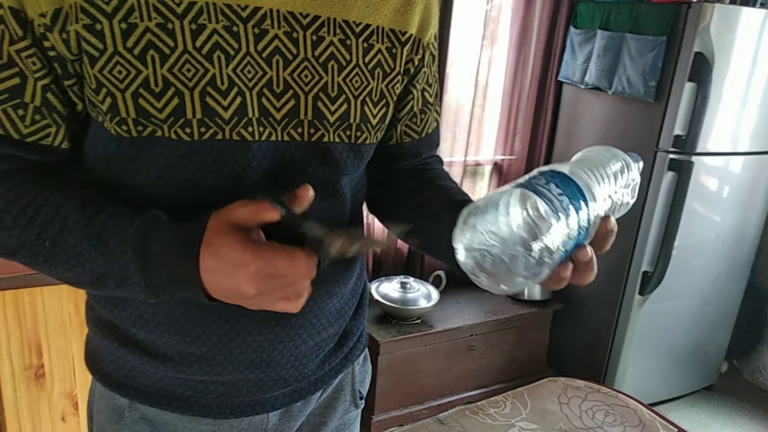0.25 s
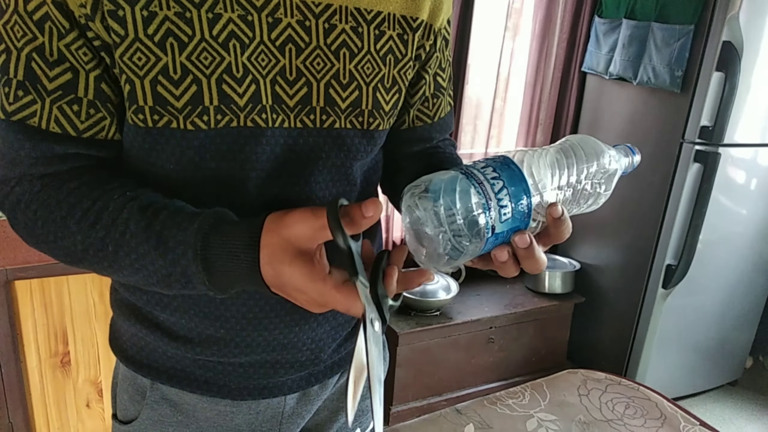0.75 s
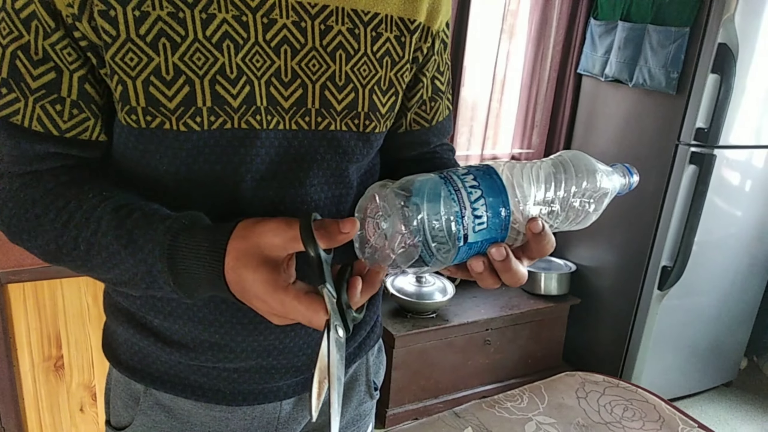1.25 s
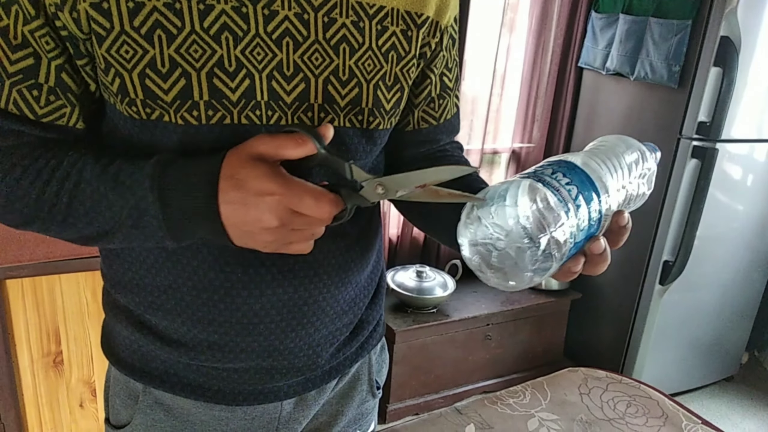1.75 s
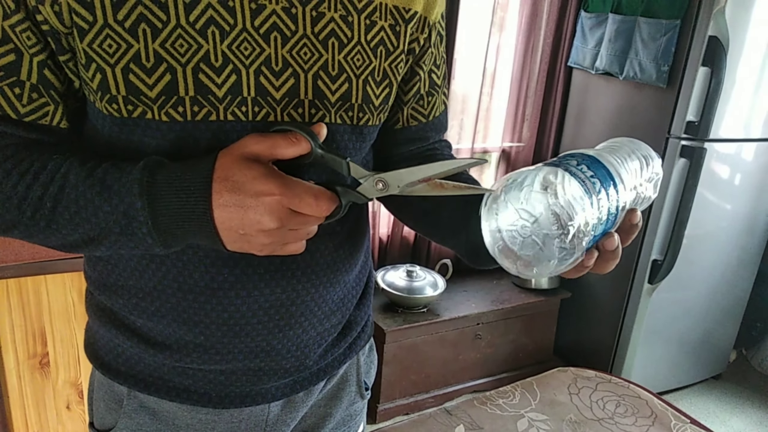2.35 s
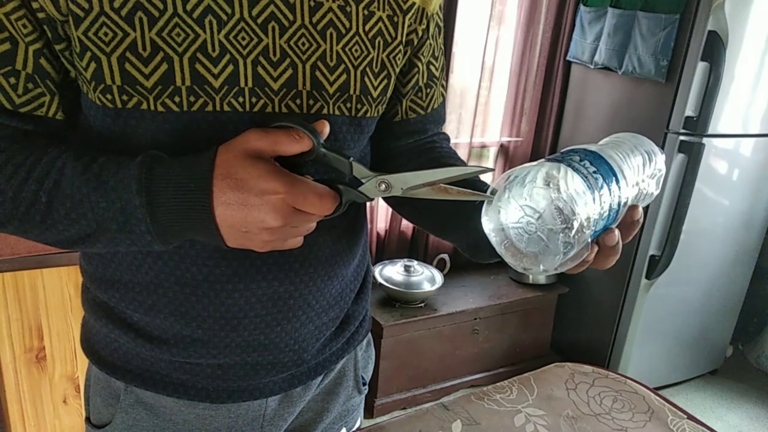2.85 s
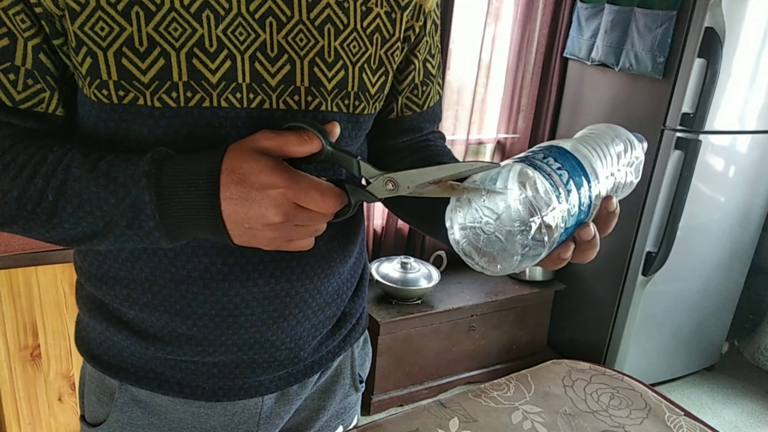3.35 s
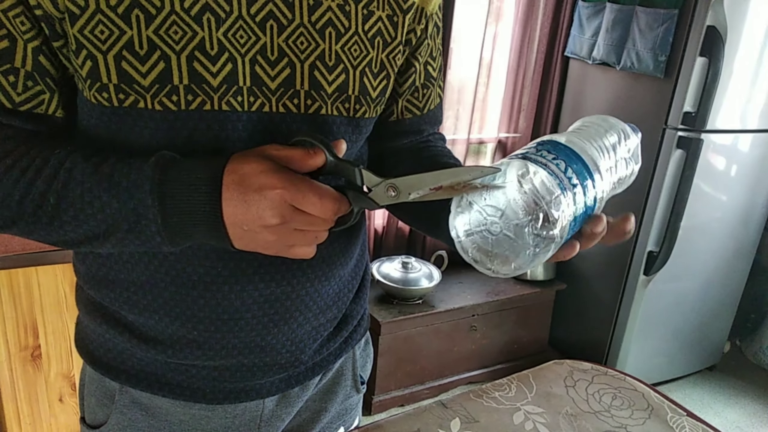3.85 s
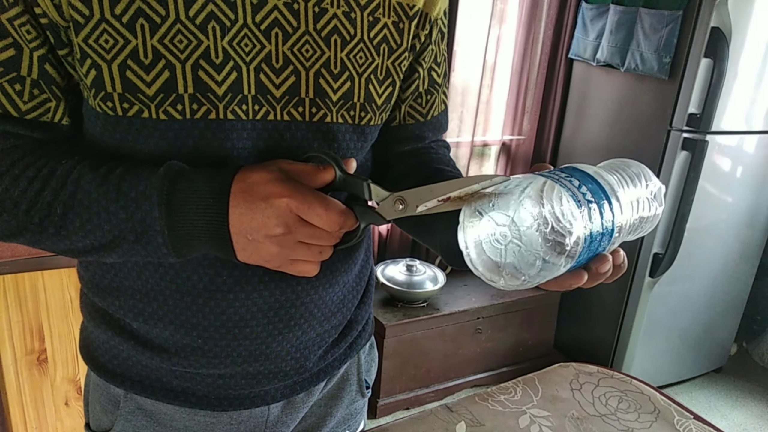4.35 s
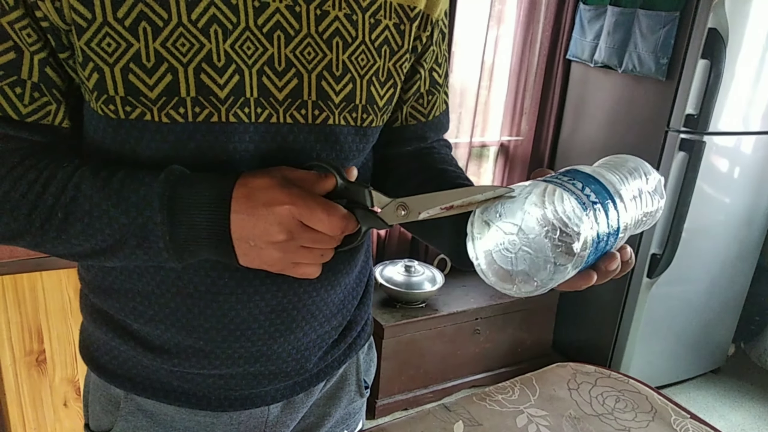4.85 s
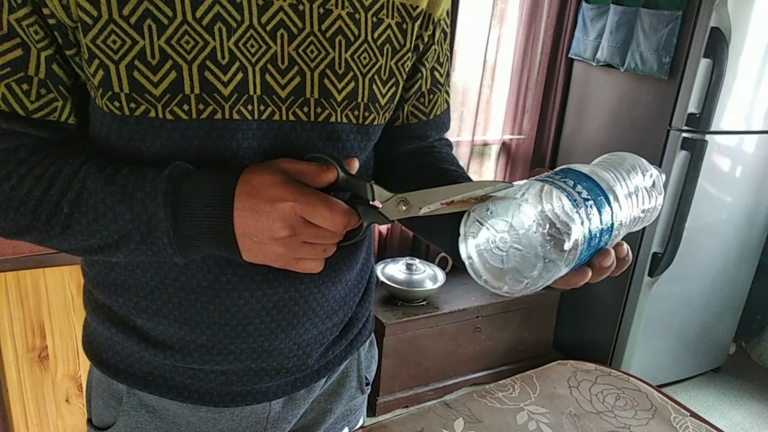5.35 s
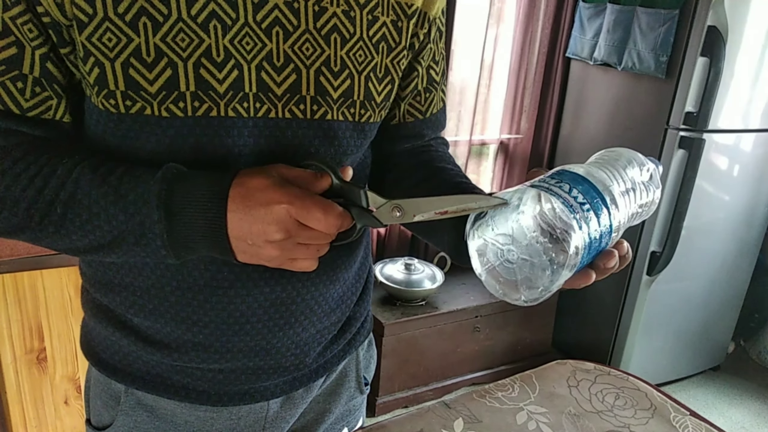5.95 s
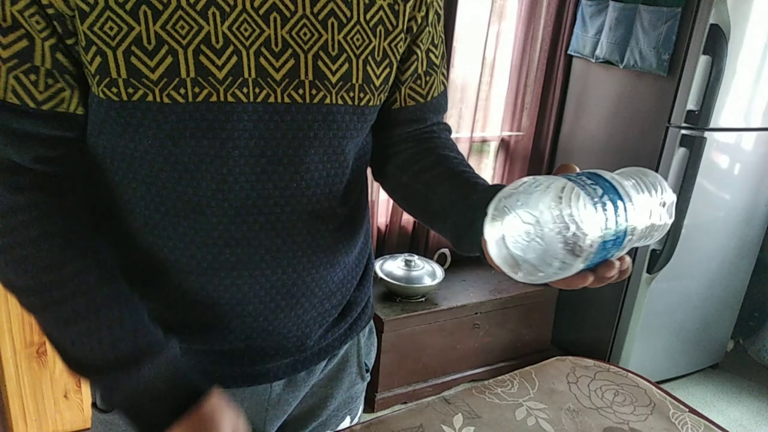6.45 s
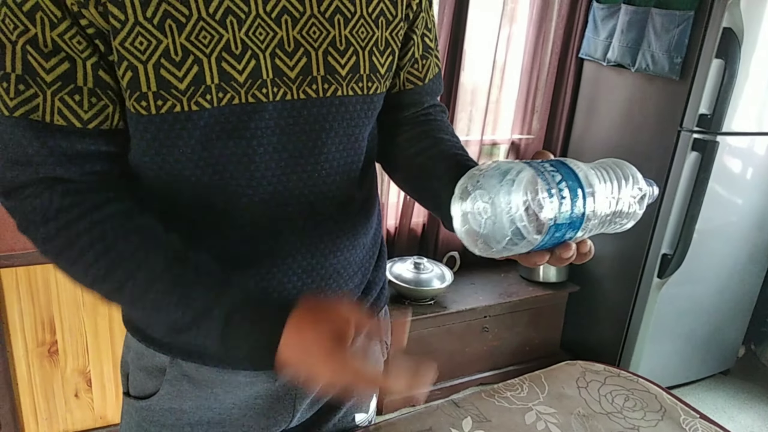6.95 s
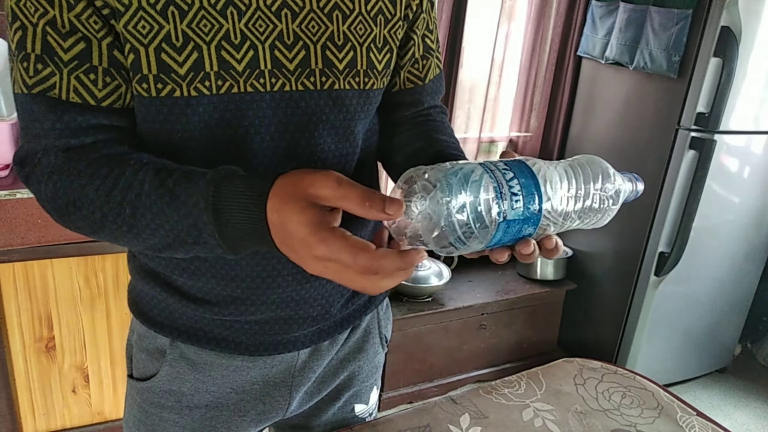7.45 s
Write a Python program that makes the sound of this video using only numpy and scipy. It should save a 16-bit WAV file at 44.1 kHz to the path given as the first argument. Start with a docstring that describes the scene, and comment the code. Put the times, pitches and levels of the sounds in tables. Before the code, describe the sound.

Close stereo phone pickup of scissors working through a flimsy empty bottle indoors. Dry plastic ticks, short crunches and hollow snaps arrive unevenly, with soft low hand rumble beneath. Loud pops stand out early, midway and later, each with a short room tail. Then a brief lull, a woody double thud with rattle as the scissors are put on a table, light crinkling and a final loud snap.

```python
"""A thin plastic bottle is cut round with scissors: its wall buckles and snaps, heard close in a furnished room.
Each snap is a ragged noise burst through the colour of the wall, a short facet ring and the bottle's air modes.
Clumped random ticks make the soft crackle of fingers and blades, and longer crunches where a fold runs on.
Steel sines ring once; impulses through low modes thump, also as the scissors are laid on a table; hands rumble.
Decaying noise tails make the room, over a hush; a phone with two microphone ports holds down the loudest moments."""
import sys
import numpy as np
from scipy import signal
from scipy.fft import rfft, irfft, next_fast_len
from scipy.io import wavfile
from scipy.ndimage import uniform_filter1d, minimum_filter1d, map_coordinates

SR = 44100
rng = np.random.default_rng(int(sys.argv[2]) if len(sys.argv) > 2 else 0)


def output_pcm(signal):
    """Save a mono or channel-first signal as 16-bit PCM at the path in sys.argv[1].

    Samples are clipped to [-1, 1] before scaling.
    """
    pcm = np.clip(np.atleast_2d(signal).T, -1, 1) * 32767
    wavfile.write(sys.argv[1], SR, np.round(pcm).astype(np.int16))


N = 339915


def amp(db):
    """Decibels to gain."""
    return 10 ** (np.asarray(db) / 20)


def unit(x):
    """Scaled to rms 1."""
    return x / np.sqrt(np.mean(x ** 2) + 1e-20)


def along(points, hz):
    """Reads a curve of (f/Hz, value) points on a log frequency axis."""
    f, value = np.transpose(points)
    return np.interp(np.log(hz + 1), np.log(f + 1), value)


def filtered(x, response):
    """Multiplies the spectrum of x by a response, with silence appended so tails do not wrap round."""
    size = next_fast_len(x.shape[-1] + SR // 2)
    spectrum = rfft(x, size) * response(np.fft.rfftfreq(size, 1 / SR))
    return irfft(spectrum, size)[..., :x.shape[-1]]


def modes(table):
    """Causal response of a few resonances, added with alternating sign."""
    def response(f):
        total = 0
        for k, (centre, width, db) in enumerate(table):
            resonance = 1j * f * width / (centre * centre - f * f + 1j * f * width)
            total = total + (-1) ** k * amp(db) * resonance
        return total
    return response


def colour(points):
    """Causal, minimum-phase response whose gain follows (f/Hz, level/dB) points."""
    def response(hz):
        cepstrum = irfft(along(points, hz) * np.log(10) / 20)
        half = len(cepstrum) // 2
        folded = np.r_[cepstrum[0], 2 * cepstrum[1:half], np.zeros(len(cepstrum) - half)]
        return np.exp(rfft(folded))
    return response


def wobble(step):
    """A smooth random curve with a knot every step samples."""
    knots = rng.standard_normal(N // step + 4)
    return map_coordinates(knots, [np.arange(N) / step])


# Left-right likeness of diffuse sound: f/Hz, correlation
PORT_LIKENESS = [(130, 0.89), (300, 0.87), (700, 0.43), (1500, 0.31), (3000, 0.012), (14000, 0.1)]


def diffuse(pair):
    """Mixes two unrelated sounds to the likeness a diffuse field has at the two ports."""
    def mid_side_gains(hz):
        turn = np.arccos(np.clip(along(PORT_LIKENESS, hz), -1, 1)) / 2
        return np.array([np.cos(turn), np.sin(turn)])
    mid, side = filtered(pair, mid_side_gains)
    return np.array([mid + side, mid - side])


# Spectral shape of the quiet room: f/Hz, relative level/dB per Hz
HUSH_SHAPE = [(15, -29.5), (25, -16.5), (107, -1), (684, -11.5), (1110, -17.5), (1750, -16.5),
              (5430, -39.5), (6380, -16.5), (6920, -22.5), (9050, -23), (15500, -27)]


def hush():
    """The quiet of the room is steady diffuse noise at -68 dB rms."""
    noise = diffuse(rng.standard_normal((2, N)))
    return amp(-68) * unit(filtered(noise, lambda hz: amp(along(HUSH_SHAPE, hz))))


# Spectral shape of the handling rumble: f/Hz, relative level/dB
RUMBLE_SHAPE = [(30, -40), (90, 3.5), (160, -2.5), (350, -5.5), (900, -32)]
# Moves of hands and sleeves: t/s at the strongest, length t/s, rumble level/dB before the lumps
HAND_MOVES = [(.2, 0.33, -69), (0.558, 0.14, -55), (.97, 0.45, -65.5), (1.994, 0.36, -65),
              (2.72, 0.56, -57.5), (3.447, 0.66, -61.5), (5.0, 0.085, -68.5), (5.415, 0.19, -52),
              (5.894, 0.14, -60), (6.377, 0.46, -56.5), (7.095, 0.46, -82)]


def hands():
    """Hands and sleeves make a soft, lumpy low noise that swells and fades with each move."""
    resting_db, lumps_db = -88, 3.7
    t = np.arange(N) / SR
    rumble = unit(filtered(diffuse(rng.standard_normal((2, N))), colour(RUMBLE_SHAPE)))
    swell = amp(resting_db)
    for peak, length, db in HAND_MOVES:
        swell = swell + amp(db) * np.exp(-(2 * (t - peak) / length) ** 2)
    return swell * amp(lumps_db * wobble(step=3000)) * rumble


def ticks(density, uneven_db, clump_db):
    """Tiny slips of uneven size come in clumps: same moments at both ports, own signs and sizes."""
    slips = rng.random(N) < density
    sizes = slips * amp(uneven_db * np.minimum(rng.exponential(size=N), 4))
    clumps = amp(clump_db * wobble(step=350))
    return unit(sizes * clumps * rng.standard_normal((2, N)))


def facet(x, hz, sharpness):
    """A patch of wall gives one broad, short ring at its own pitch, 9 kHz at most; sharpness is the Q."""
    b, a = signal.iirpeak(min(hz, 9000), sharpness, fs=SR)
    return signal.lfilter(b, a, x)


def crinkle(density, uneven_db, clump_db):
    """Facets of several sizes tick on their own, so the colour keeps changing."""
    total = 0
    for hz in (1360, 2200, 3750, 5100, 8000):
        total = total + unit(facet(ticks(density, uneven_db, clump_db), hz, sharpness=2.5))
    return unit(total)


# How hard the wall is gripped and sheared: t/s, crackle level/dB driving the wall
WALL_GRIP = [(0, -66), (.3, -107), (.54, -66), (1.1, -80), (1.8, -77), (1.95, -55), (2.22, -52.5),
             (2.3, -69.5), (2.36, -41.5), (2.55, -54.5), (3.3, -52), (3.65, -71), (4.3, -81), (4.62, -71),
             (4.68, -59), (4.85, -78), (5.25, -81.5), (5.4, -79), (5.62, -46.5), (5.85, -64.5), (6.5, -72),
             (7.12, -79.5), (7.17, -56.5), (7.45, -81), (7.71, -81)]
# Crunches, where a fold runs on, the blades tear or the scissors rattle down:
# start t/s, rise t/s, hold t/s, level/dB driving the wall, treble edge level/dB relative to it
FOLD_CRUNCHES = [(0.045, 0.018, 0.079, -43, -10), (0.147, 0.028, 0.08, -42, -2.5),
                 (0.483, 0.013, 0.065, -49, -9), (0.807, 0.015, 0.022, -39, -4),
                 (1.067, 0.031, 0.01, -37.5, 1.5), (1.435, 0.028, 0.0028, -29, 1),
                 (1.815, 0.0074, 0.031, -37, -8.5), (2.083, 0.038, 0.03, -41.5, -7),
                 (2.461, 0.008, 0.02, -37, -8.5), (2.932, 0.03, 0.096, -37.5, -6.5),
                 (3.437, 0.0082, 0.025, -24, -2.5), (4.073, 0.011, 0.032, -22.5, 3),
                 (4.704, 0.026, 0.036, -49.5, -9.5), (5.686, 0.025, 0.023, -35, -5),
                 (6.072, 0.022, 0.098, -36.5, -9), (6.801, 0.022, 0.037, -23, -5.5),
                 (7.217, 0.09, 0.025, -44.5, 6.5), (7.438, 0.015, 0.021, -74.5, 19.5),
                 (7.644, 0.0098, .06, -32.5, 16)]


def crackle():
    """The gripped wall ticks softly all along and crunches when a fold runs."""
    usual_db = -40  # level of a usual crunch
    usual_t60, settle_grows = 0.042, 0.9  # s for its fall; louder folds settle longer (dB per dB)
    usual_air_db, air_lags = -6.5, 0.41  # air drive relative to its wall; it grows less (dB per dB)
    t = np.arange(N) / SR
    grip = amp(np.interp(t, *np.transpose(WALL_GRIP)))
    wall = grip * crinkle(density=0.04, uneven_db=3, clump_db=6)
    edge = amp(-16.0) * wall
    air = amp(-1.5) * grip * ticks(density=0.12, uneven_db=4.5, clump_db=3)[0]
    dense = crinkle(density=0.15, uneven_db=6, clump_db=2)
    jolts = ticks(density=0.1, uneven_db=3.5, clump_db=2.5)
    for start, rise, hold, db, edge_db in FOLD_CRUNCHES:
        t60 = usual_t60 * amp(settle_grows * (db - usual_db))
        air_db = usual_air_db - air_lags * (db - usual_db)
        fall = amp(-60 * np.maximum(t - start - rise - hold, 0) / t60)
        run = amp(db) * np.clip((t - start) / rise, 0, 1) ** 2 * fall
        wall = wall + run * dense
        edge = edge + amp(edge_db) * run * jolts
        air = air + amp(air_db) * run * jolts[0]
    air_pair = np.array([air, air])
    return np.array([wall, edge, amp(20) * air_pair, amp(13.5) * air_pair])


# Colour of the plastic wall: f/Hz, level/dB
WALL_COLOUR = [(100, -47.5), (500, -18), (1500, -2), (2700, 2.5), (4500, 0), (7000, -13.5), (12000, -52)]
# Colour of the treble edge: f/Hz, level/dB
EDGE_COLOUR = [(2000, -111.5), (5000, 9.5), (7000, 6), (10000, 4.5), (13000, -1.5), (16000, -12.5)]
# Low air modes in the bottle, before squeezing: f/Hz, width f/Hz, level/dB
LOW_AIR_MODES = [(402, 22.9, 5), (282, 58, -35)]
# Upper air modes in the bottle, before squeezing: f/Hz, width f/Hz, level/dB
UPPER_AIR_MODES = [(1007.5, 78.7, 7), (1700, 28.6, 2), (763, 37, -9)]


def bottle(wall, edge, low, upper):
    """Four drives sound the plastic wall and the air inside; squeezing shifts the air modes a little."""
    sound = filtered(wall, colour(WALL_COLOUR)) + filtered(edge, colour(EDGE_COLOUR))
    for drive, table in ((low, LOW_AIR_MODES), (upper, UPPER_AIR_MODES)):
        response = modes(table)
        # crossfade between modes lowered about 1 % and modes raised 2.8 %
        squeeze = np.pi / 4 * (1 + np.tanh(wobble(step=5000)))
        sound = sound + filtered(drive * np.cos(squeeze), lambda hz: response(hz * 1.0103))
        sound = sound + filtered(drive * np.sin(squeeze), lambda hz: response(hz / 1.028))
    return sound


# Decay of the room before its unevenness: f/Hz, t60 t/s
ROOM_DECAY = [(100, 0.15), (400, 0.41), (1000, 0.35), (3000, .38), (8000, 0.34), (14000, 0.24)]


def room(x, size=SR // 4):
    """The hands move, so every quarter second meets a new tail; each frequency dies at its own speed."""
    out = np.zeros((2, N + SR))
    for start in range(0, N, size):
        hz, t, grid = signal.stft(rng.standard_normal((2, SR // 2)), SR, nperseg=256)
        # furniture scatters unevenly over frequency and time
        patches = uniform_filter1d(rng.standard_normal(grid.shape), size=3, axis=1)
        uneven = unit(uniform_filter1d(patches, size=12, axis=2))
        decay_db = -60 * t / along(ROOM_DECAY, hz)[:, None]
        tail = signal.istft(grid * amp(4.1 * uneven + decay_db), SR, nperseg=256)[1]
        # the first walls take a while to answer
        tail = tail * (1 - np.exp(-np.arange(tail.shape[1]) / (0.002 * SR)))
        tail = tail / np.linalg.norm(tail[0])
        wet = signal.fftconvolve(x[None, start:start + size], tail, axes=1)
        out[:, start:][:, :wet.shape[1]] += wet
    return diffuse(out[:, :N])


def faint(count=70):
    """Small snaps come at chance moments, their strength following the grip."""
    usual = (14.5, -11.5, -14, -9.5)  # dB: crack over the grip; low air, upper air, brightness re crack
    scatter = (3, 2.6, 3, 6.3)  # dB, standard deviation of each
    s = rng.random(count) * N / SR
    rows = usual + rng.standard_normal((count, 4)) * scatter
    rows[:, 0] += np.interp(s, *np.transpose(WALL_GRIP))
    return np.column_stack([s, rows])


# Snaps of the wall: t/s, crack level/dB before the drive trims,
# then relative to the crack: low air level/dB, upper air level/dB, brightness level/dB
WALL_SNAPS = [(0.0737, -35.5, -4, -23, -5), (0.184, -24, -44, -25, -3.5), (0.2169, -31, -2.5, -6.5, -6),
              (0.2477, -40.5, -10, 1, -15), (0.4967, -37.5, 0.5, -5, 4), (0.5189, -33, -1, -4, -6),
              (0.5987, -31, -15, -13.5, -2), (0.614, -31.5, -6, -4.5, -5.5),
              (0.6988, -46.5, -20, -4.5, -11), (0.825, -32, -7, -5, 1), (0.8765, -27, -14, -6, -9),
              (0.9243, -32.5, -6.5, -4.5, -22), (1.0625, -39, -27, -9, 5), (1.0894, -31.5, -10, -18, -13),
              (1.1129, -17, -12.5, -10, -0.5), (1.4551, -20.5, -8, -16, -22), (1.466, -7, -15, -8, -17.5),
              (1.8188, -46.5, -0.5, 9, -17), (1.8506, -20, -3.5, -11.5, -8.5),
              (2.0582, -39.5, -6, -1.5, -6), (2.1154, -38, -5, 1, 9), (2.1297, -24, -35, -13, 2),
              (2.2413, -43, -26, -0.5, -1), (2.3251, -37.5, -5, -3.5, -10), (2.3523, -33, -4, -2, -2.5),
              (2.37, -35, 1, -10, -4), (2.4719, -33, -11, 1, -22), (2.4855, -24.5, -28, -5, -19),
              (2.6598, -28.5, -5.5, -6, -4), (2.679, -30, -2, -2.5, -8), (2.741, -38, 5, 5.5, -4.5),
              (2.8228, -32, -3.5, -6, -42), (2.8678, -37, -2.5, -5, -11), (2.9118, -29.5, -19, -5, -17),
              (2.9558, -25, 0.5, -1, -13), (2.9764, -15.5, -14, -6.5, -8), (3.1189, -35, -4, -32, -16),
              (3.181, -21.5, -32, -21, -32), (3.2769, -38.5, 0.5, -12, -9), (3.3289, -32, -38, -3, -8),
              (3.3478, -30.5, -9, -10.5, -27), (3.4496, -2, -53, -16, -3.5), (3.6091, -15, -44, -34, -3),
              (3.8448, -30.5, -0.5, -2, -11), (3.8617, -28, -8, -6, -12.5), (3.9707, -32, -16, -15, 9),
              (3.9808, -9, -14.5, -11.5, -5), (4.0908, -5, -14.5, -13, -1.5),
              (4.1116, 0.5, -24, -28.5, -7.5), (4.6927, -45.5, 0.5, -4.5, 1), (4.7238, -39, -1, -6, -2),
              (4.7467, -36.5, -1, -6, -1), (4.781, -40, -3, 2.5, -25), (4.9038, -37.5, -46, -10.5, -6.5),
              (5.0195, -44.5, 8, 2, -48), (5.2779, -33.5, -17, -14.5, -7), (5.2905, -20.5, -7, -0.5, -3.5),
              (5.3973, -31, 1, -15.5, -38), (5.5504, -37.5, 8, -4, -10), (5.6243, -37.5, 1, 0, -15.5),
              (5.7017, -30.5, 3, -15, -36), (5.7224, -20.5, -10.5, -12, -5), (5.7563, -42.5, 2, 5.5, -40.5),
              (5.8943, -39, -0.5, -7.5, -6.5), (6.0498, -5, -14, -14.5, -24.5),
              (6.12, -14.5, -26, -10.5, -7), (6.154, -42.5, -37, 11, -17), (6.1699, -25.5, -8, -26, 0.5),
              (6.4565, -23, -9.5, -6.5, -33), (7.1512, -54.5, -27, 2, -5), (7.2359, -42, -5, -28, -0.5),
              (7.2926, -20.5, -46, -13, 2), (7.3267, -25, -44, -37, -2.5), (7.4592, -37.5, -22.5, -35, -15),
              (7.6598, 5, -23, -13.5, -2.5)]


def snaps():
    """A snap is a short ragged burst with its own detail at each port; the room gets one even push."""
    # rows of four: wall, treble edge, low air, upper air
    near, spread = np.zeros((4, 2, N + SR)), np.zeros((4, N + SR))
    t = np.arange(SR // 10) / SR
    # s, for a crack of -14.5 dB; the treble band rises softest and fades slowest
    t60 = np.array([[0.024], [0.045], [0.035], [0.024]])
    rise = np.array([[0.003], [0.007], [0.003], [0.002]])
    for s, db, low_db, upper_db, edge_db in [*WALL_SNAPS, *faint()]:
        # small facets snap bright and high: pitch rises 0.16 dB per dB of brightness, with scatter
        hz = 4195 * amp(0.16 * edge_db + rng.normal(0, 1.38))
        pace = t * amp(0.19 * (db + 14.5))  # weak folds give way more slowly
        shape = amp(-60 * pace / t60) * (1 - np.exp(-pace / rise))
        size = amp(db + np.array([[8], [edge_db + 1.5], [low_db + 26.5], [upper_db + 22.0]]))
        # the fold gives way in jerks of about 1 ms
        ragged = amp(1.2 * np.repeat(rng.standard_normal(len(t) // 45), 45))
        burst = rng.standard_normal((4, 2, len(t))) * (size * shape * ragged)[:, None]
        burst[2:, 1] = burst[2:, 0]  # long waves reach both ports alike
        # louder snaps have a stronger room tail, as when a recorder holds down their peaks
        tail_gain = amp(0.1 * (db + 23.5))
        push = size * np.linalg.norm(shape, axis=1)[:, None] * (t == 0) * tail_gain
        burst[0] = amp(-1) * burst[0] + amp(2.5) * facet(burst[0], hz, sharpness=4.5)
        push[0] = amp(-4.5) * push[0] + amp(-1) * facet(push[0], hz, sharpness=1.4)
        at = round(s * SR)
        near[..., at:][..., :len(t)] += burst
        spread[:, at:][:, :len(t)] += push
    return near[..., :N], spread[:, :N]


# Steel of the scissors: f/Hz, level/dB, t60 t/s
BLADE_RINGS = [(2280, -46, 0.46), (3370, -45, 0.19)]


def blades():
    """The blades knock the bottle: a thin ring of steel builds up softly and dies away."""
    strike_s, build_s = 1.116, 0.053
    t = np.maximum(np.arange(N) / SR - strike_s, 0)
    ring = 0
    for hz, db, t60 in BLADE_RINGS:
        phase = 2 * np.pi * hz * t + 0.6 * wobble(step=900)  # the pitch wavers slightly
        ring = ring + amp(db - 60 * t / t60) * np.sin(phase)
    return ring * (1 - np.exp(-t / build_s))


# Low modes of all the thumps: f/Hz, width f/Hz, level/dB
THUMP_LOW_MODES = [(147.5, 19, 3), (88, 25, -11.5), (204, 19, -11)]
# Upper modes of all the thumps: f/Hz, width f/Hz, level/dB
THUMP_UPPER_MODES = [(278, 118, 1), (467, 40, -0.5), (507, 51, 2), (1270, 120, -15)]
# Low thumps: of big snaps, of the hand on the bottle base, of scissors on the table:
# t/s, level/dB before the mode trims, then relative to it: upper modes level/dB, noise click level/dB
LOW_THUMPS = [(1.465, -26.5, 9, 16), (2.975, -41.5, 18, 8), (3.981, -44.5, 16, 20), (5.292, -42.5, 16.5, 7),
              (6.68, -14, 1, -24.5), (6.823, -22, 8.5, 9.5), (6.844, -23.5, -22, -5),
              (6.856, -12.5, -4, -17), (6.879, -19.5, -3.5, -27), (7.69, -36.5, 19.5, -10)]


def thumps():
    """Single impulses ring one shared set of damped modes, each with a short noise click."""
    low, upper, click = np.zeros((3, N + SR))
    t = np.arange(SR // 20) / SR
    click_t60 = 0.0081  # s
    for s, db, upper_db, click_db in LOW_THUMPS:
        at = round(s * SR)
        low[at] = -amp(db + 46.0)
        upper[at] = -amp(db + upper_db + 34.5)
        click[at:][:len(t)] += amp(db + click_db - 60 * t / click_t60) * rng.standard_normal(len(t))
    body = filtered(low, modes(THUMP_LOW_MODES)) + filtered(upper, modes(THUMP_UPPER_MODES))
    return (body + click)[:N]


def scene():
    """Bottle and thumps direct and through the room, over steel, hands and hush."""
    snap, spread = snaps()
    crunch = crackle()
    thump = thumps()
    bottle_to_room = bottle(*(spread + amp(-2.5) * crunch[:, 0]))
    wet = room(amp(-4.5) * bottle_to_room + thump)
    return bottle(*(snap + crunch)) + thump + blades() + wet + hands() + hush()


# The phone's body shades each port: f/Hz, left minus right level/dB
PORT_SHADE = [(300, 0), (1800, 0), (4200, 2.5), (6500, 3), (9800, -4), (15000, -1.5)]


def record(dry):
    """Shaded ports, then a fast limiter eases down peaks round its knee; a steep band limit ends the top."""
    knee, top_hz = 0.44, 15700  # knee as a fraction of full scale
    shaded = filtered(dry, lambda hz: amp(np.outer([0.5, -0.5], along(PORT_SHADE, hz))))
    peak = -minimum_filter1d(-np.abs(shaded).max(axis=0), 201)  # loudest within about 4.6 ms
    gain = uniform_filter1d((1 + (peak / knee) ** 4) ** -0.22, 201)
    return filtered(shaded * gain, lambda hz: 1 / (1 + (hz / top_hz) ** 200))


dry = scene()
out = record(dry)
output_pcm(out)
```